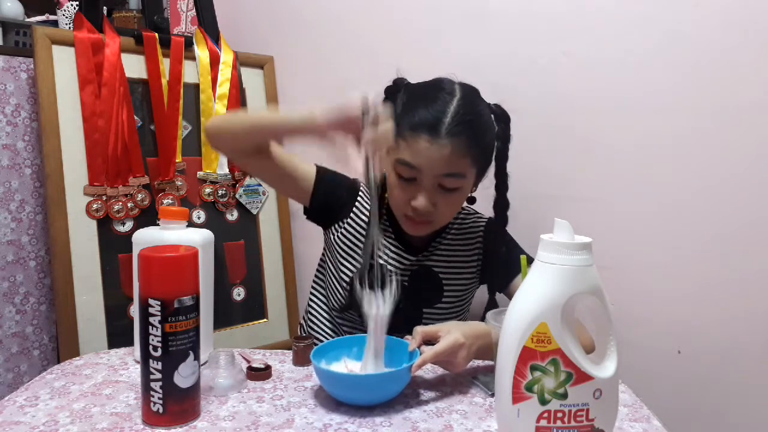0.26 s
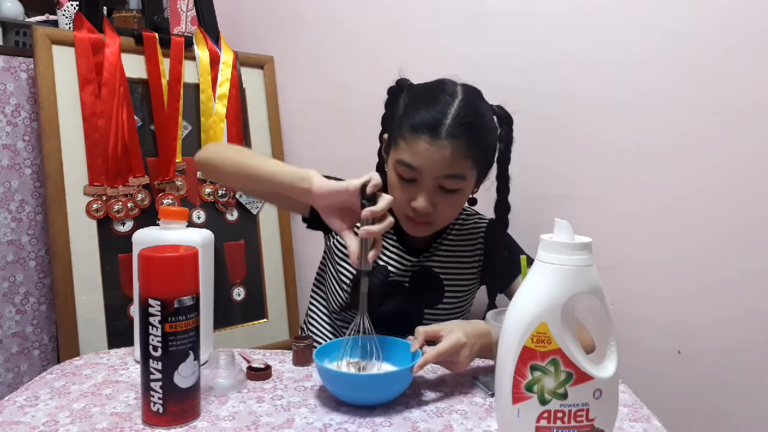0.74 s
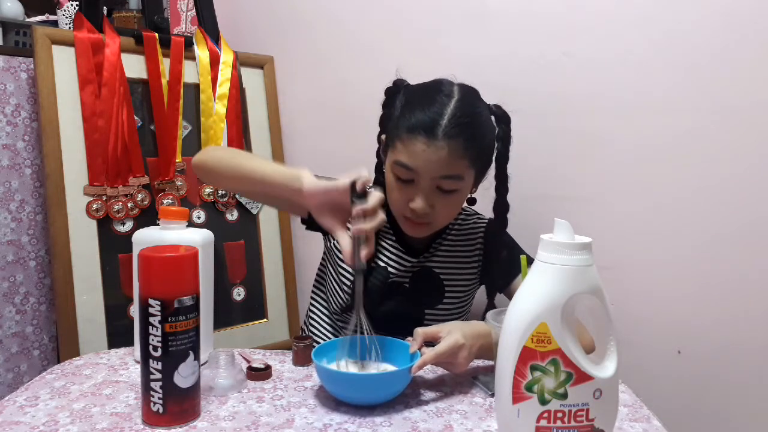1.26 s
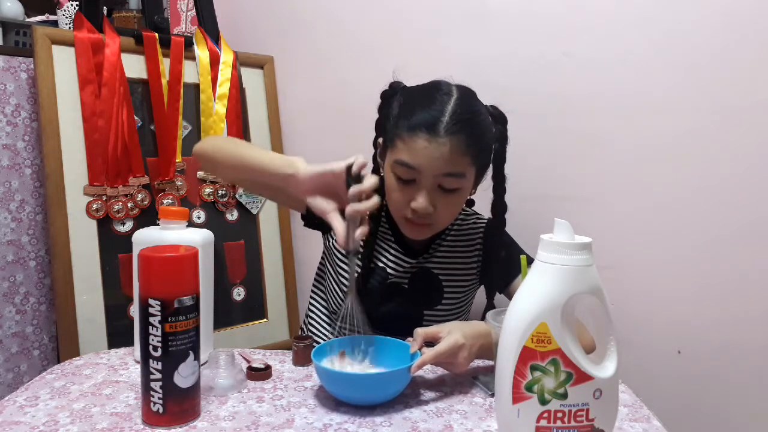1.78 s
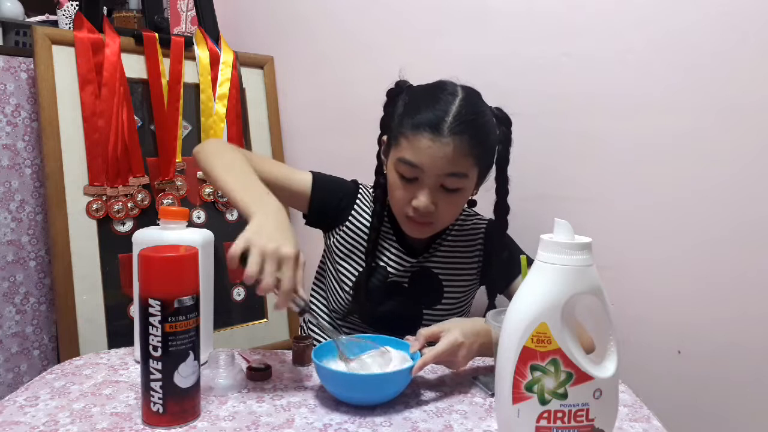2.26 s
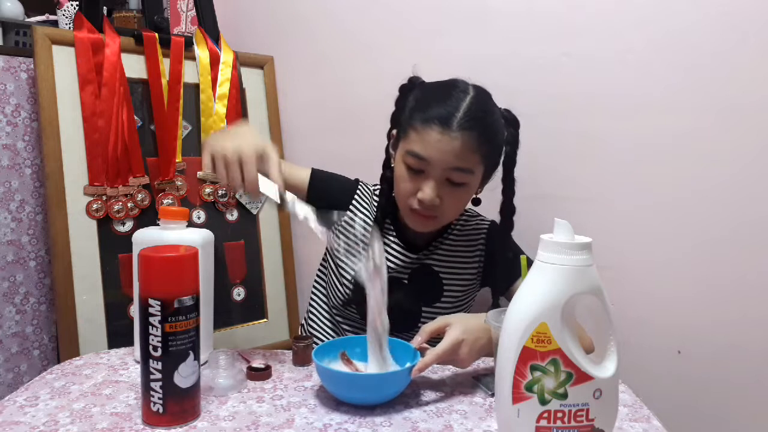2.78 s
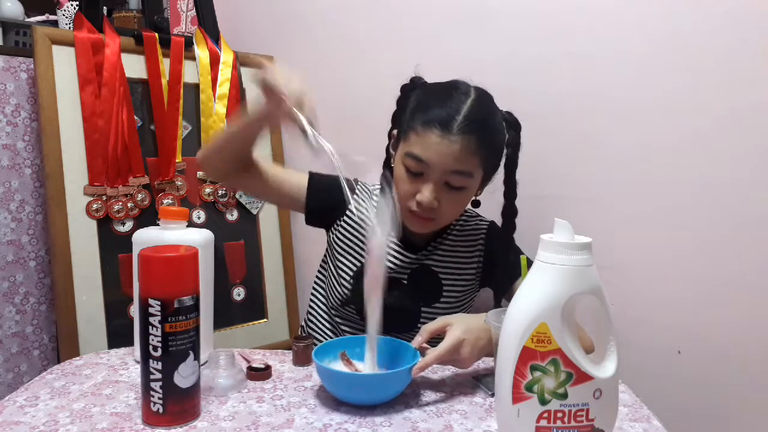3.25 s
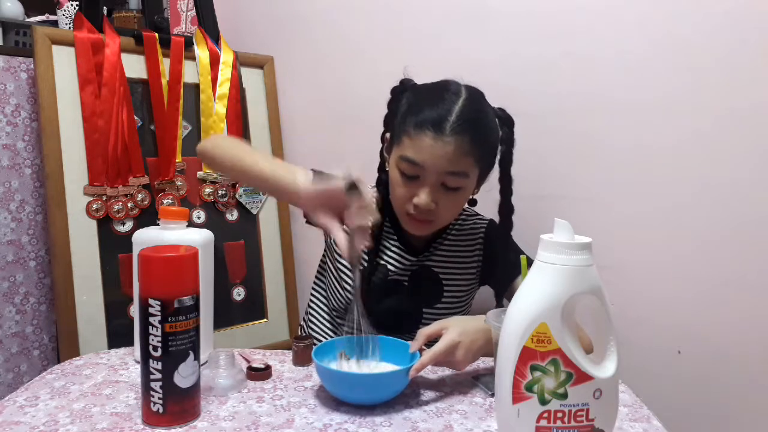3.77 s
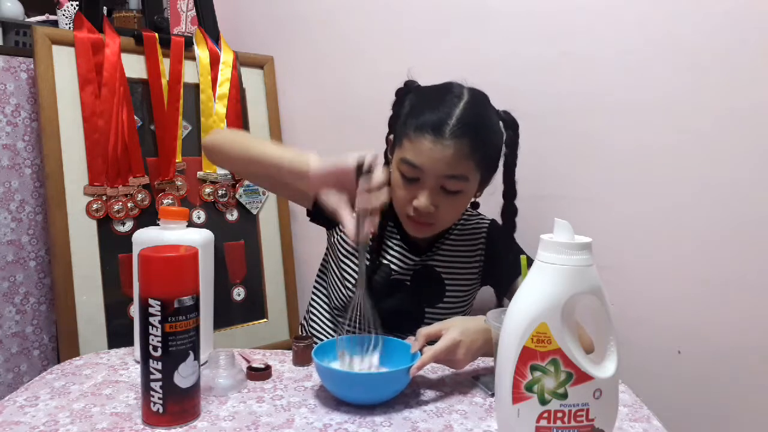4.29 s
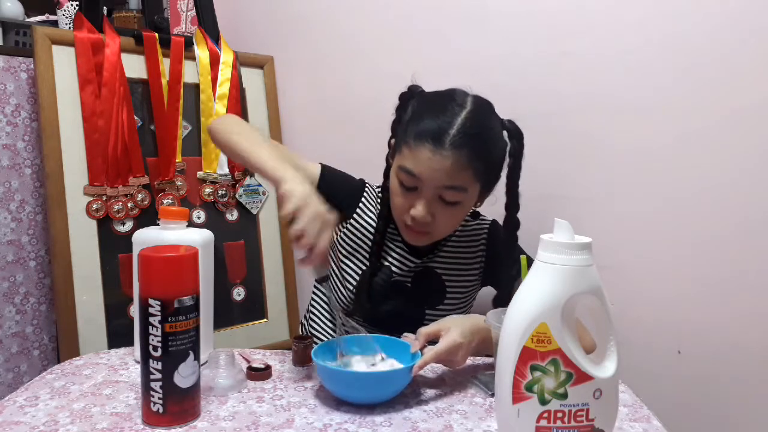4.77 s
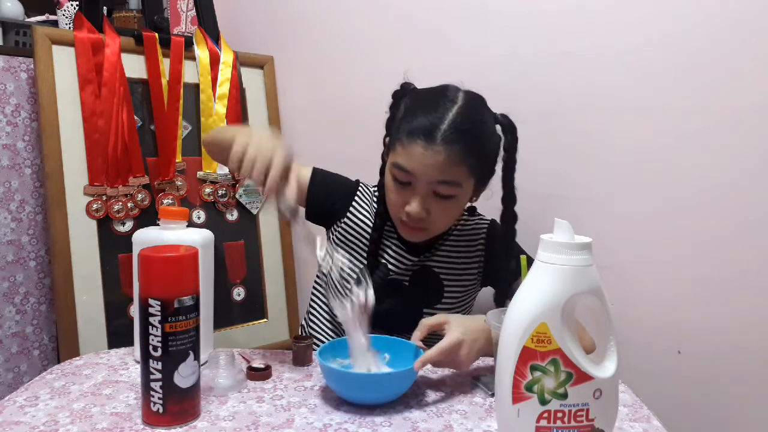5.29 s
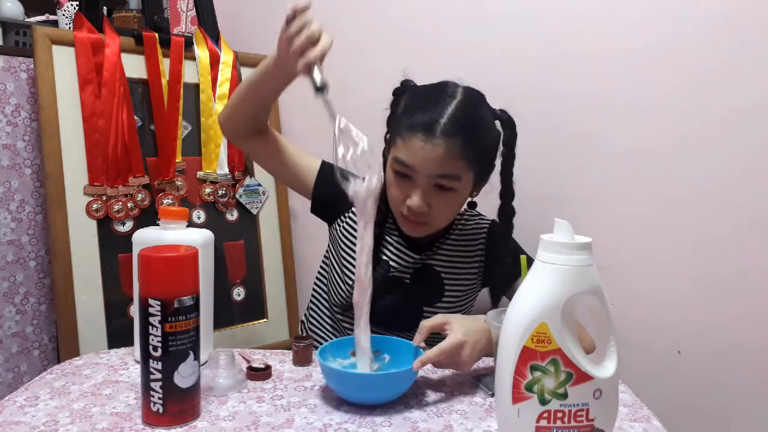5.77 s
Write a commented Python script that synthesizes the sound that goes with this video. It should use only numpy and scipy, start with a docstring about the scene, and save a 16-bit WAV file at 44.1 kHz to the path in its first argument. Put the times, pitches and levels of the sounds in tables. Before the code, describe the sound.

A wire whisk works thick slime in a plastic bowl, which knocks unevenly on a table amid faint wire clicks and sticky pops.

```python
"""Whisk in a bowl of slime

A wire whisk is dipped into thick slime and lifted again, in a plastic bowl on a table in a small,
bare room. The sticky mass drags the bowl up and lets it knock back on the table; the wires click and
air pockets pop softly. Under it lie quiet room noise and the faint drone of a distant engine."""
import sys
import numpy as np
from scipy import signal
from scipy.fft import rfft, irfft, next_fast_len
from scipy.io import wavfile
from scipy.ndimage import map_coordinates

SR = 44100
rng = np.random.default_rng(int(sys.argv[2]) if len(sys.argv) > 2 else 0)


def transcribe(u):
    """Save the signal u as a 16-bit wav file named by the first command-line argument.

    u: samples, shape (n,) or (channels, n), limited to [-1, 1]; the rate is SR.
    q: integer samples, one column per channel.
    """
    v = np.clip(np.atleast_2d(u).T, -1, 1)
    q = np.round(v * 32767).astype(np.int16)
    wavfile.write(sys.argv[1], SR, q)


N = 266364


def amp(db):
    """Decibels to gain."""
    return 10 ** (np.asarray(db) / 20)


def unit(x):
    """Scale to rms 1."""
    return x / np.sqrt(np.mean(x ** 2) + 1e-20)


def unit_attack(x):
    """Scale a hit to rms 1 over its first 25 ms."""
    return x / np.sqrt(np.mean(x[..., :SR // 40] ** 2) + 1e-20)


def along(points, hz):
    """Read a curve of (f/Hz, value) points on a log frequency axis."""
    f, values = np.transpose(points)
    return np.interp(np.log(hz + 1), np.log(f + 1), values)


def automation(rows):
    """One value per sample for each column after the time."""
    times, *columns = np.transpose(rows)
    return [np.interp(np.arange(N) / SR, times, column) for column in columns]


def wobble(x):
    """A smooth random curve with one knot per unit of x."""
    return map_coordinates(rng.standard_normal(int(x.max()) + 4), [x])


def filtered(x, response):
    """EQ x with a gain given as a function of frequency."""
    n = x.shape[-1]
    padded = next_fast_len(n + 8192)
    return irfft(rfft(x, padded) * response(np.fft.rfftfreq(padded, 1 / SR)), padded)[..., :n]


def add(track, s, sound):
    """Mix a sound into the track at time s."""
    start = max(round(s * SR), 0)
    part = track[:, start:start + sound.shape[-1]]
    part += sound[..., :part.shape[1]]


# Stereo width of the contacts, close to mono: f/Hz, side against mid/dB
CONTACT_WIDTH = [(150, -88), (500, -99), (1000, -74), (2000, -50), (4000, -44), (8000, -42), (14000, -28)]
def noise(colour, size, width=CONTACT_WIDTH):
    """Coloured stereo noise of rms 1, narrow in the bass and wider in the treble."""
    def mid_side_gains(hz):
        mid_db = along(colour, hz)
        return amp([mid_db, mid_db + along(width, hz)])
    mid, side = filtered(rng.standard_normal((2, size)), mid_side_gains)
    return unit(np.array([mid + side, mid - side]))


# Spectrum of the room tone: f/Hz, relative level/dB
AIR_COLOUR = [(15, -39), (25, -8.5), (91, -3.5), (156, 2), (198, -21), (233, -3), (313, -10), (399, -12.5),
              (433, -16.5), (703, -20), (970, -19), (1110, -16), (2300, -20), (3170, -20.5), (15500, -36.5)]
# Stereo width of the room tone: f/Hz, side against mid/dB
AIR_WIDTH = [(60, -22), (110, -23), (200, -19.5), (380, -10), (700, -1), (1290, -6.5), (2380, -5),
             (4400, -5), (8120, -5), (15000, 0.5)]
def room_tone():
    """A quiet, steady bed of bass-heavy noise."""
    return amp(-62.06) * noise(AIR_COLOUR, N, AIR_WIDTH)


# Swells of the handling rustle: t/s, level/dB
RUSTLE_LEVEL = [(0.0, -58), (1.66, -60.5), (1.95, -56.5), (3.08, -62.5), (4.58, -58), (6.04, -64.5)]
def stirring():
    """Hand and whisk rub the bowl, which passes a dull rustle to the table."""
    level_db, = automation(RUSTLE_LEVEL)
    # f/Hz, relative level/dB
    colour = [(40, -32), (90, -27), (160, 1.5), (260, -2), (450, -10.5), (1200, -19.5), (5000, -36)]
    return amp(level_db) * noise(colour, N)


# The engine's firing note: t/s, f/Hz, level before the fade/dB
ENGINE_NOTE = [(0.0, 56.5, -67), (0.58, 57.3, -73), (1.77, 62.7, -55), (2.08, 63.7, -74.5),
               (2.35, 63.6, -61), (2.45, 57.3, -74), (2.9, 57.1, -72)]
ENGINE_FADE_S = (2.8, 3.4)
def engine():
    """Only the firing note of a distant engine passes through the walls, then it fades out."""
    hz, db = automation(ENGINE_NOTE)
    fade = np.interp(np.arange(N) / SR, ENGINE_FADE_S, [1, 0])
    return amp(db) * fade * unit(np.sin(2 * np.pi * np.cumsum(hz) / SR))


# Reverb tail of the small room: f/Hz, t60/s
ROOM_DECAY = [(150, 0.23), (500, 0.22), (1500, 0.2), (3500, 0.2), (12000, 0.21)]
def burst(colour, t, crack, crack_t60, rise, ripple_db, ripple_hz):
    """A contact noise: a short direct crack, then the room's wash dying band by band."""
    hz, frame_s, spectrum = signal.stft(noise(colour, len(t)), SR, nperseg=256)
    # a random ripple across the spectrum gives each contact its own colour
    tint_db = ripple_db * wobble(hz / ripple_hz)[:, None]
    decay_db = 60 * frame_s / along(ROOM_DECAY, hz)[:, None]
    wash = signal.istft(spectrum * amp(tint_db - decay_db), SR, nperseg=256)[1][:, :len(t)]
    transient = 1 + crack * amp(-60 * t / crack_t60)
    return unit_attack(wash * transient * (1 - np.exp(-t / rise)))


def ring(modes, t, scatter_db, rise):
    """Damped modes, at new strengths and phases for each hit."""
    hz, db, t60 = np.transpose(modes)[:, :, None]
    db = db + scatter_db * rng.standard_normal(hz.shape)
    phase = 2 * np.pi * (hz * t + rng.random(hz.shape))
    partials = amp(db - 60 * t / t60) * np.sin(phase)
    return unit_attack(np.sum(partials, axis=0) * (1 - np.exp(-t / rise)))


def favour(modes, hz, boost_db, octaves):
    """The place of a contact drives the modes near one frequency hardest."""
    return [(f, db + boost_db * np.exp(-(np.log2(f / hz) / octaves) ** 2), t60) for f, db, t60 in modes]


def softened(modes, blow_db, edge_hz, hard_db, slope):
    """A gentle blow stays in contact longer and barely wakes the upper modes."""
    loss_db = slope * min(blow_db - hard_db, 0)
    return [(f, db + loss_db * (f > edge_hz), t60) for f, db, t60 in modes]


# Low modes of table and room: f/Hz, relative level/dB, t60/s
TABLE_MODES = [(149.7, -1.5, 0.16), (191.3, -6, 0.18), (209.6, 1.5, 0.19), (280.4, -2, 0.11)]
THUD_HZ, THUD_T60_S, THUD_RISE_S, STIFFEN_HZ_PER_DB = 198.4, 0.046, 0.00098, 4.5
def table_thud(t, slam_db):
    """The table top gives way and swings back; a slam stiffens the contact and raises the pitch."""
    hz = THUD_HZ + STIFFEN_HZ_PER_DB * slam_db
    swing = np.sin(2 * np.pi * hz * t) * amp(-60 * t / THUD_T60_S)
    thud = unit_attack(swing * (1 - np.exp(-t / THUD_RISE_S)))
    # the boom blooms behind the first swings
    boom = ring(favour(TABLE_MODES, hz, boost_db=1, octaves=0.19), t, scatter_db=4.5, rise=0.021)
    return thud + 0.34 * boom


# Modes of the bowl on the table: f/Hz, relative level/dB, t60 without the hand's grip/s
BOWL_MODES = [(325, -4, .2), (368, -7, .16), (412, 0, .185), (472, -4, .135), (497, -4, .125),
              (549, -9, .16), (620, -8, .12), (663, -3, .18), (700, -8, .165), (724, -6, .13),
              (788, -12, .145), (882, -12, .14), (921, -10, .14), (1165, -13, .135), (1212, -12, .13),
              (1370, -16, .145)]
# Spectrum of the contact's tock: f/Hz, relative level/dB
TOCK_COLOUR = [(70, -67), (130, -21), (260, 7), (450, -2.5), (660, 5), (780, -23), (1000, -9), (1200, -2),
               (1600, -38), (4000, -72)]
BASE_HZ, GRIP_DB_PER_S = 375, 45
def bowl_ring(t, blow_db, slam_db, ring_hz):
    """A short, broad tock sets the plastic bowl ringing, damped by the hand that holds it."""
    modes = favour(BOWL_MODES, BASE_HZ, boost_db=1.5, octaves=0.38)  # the base takes every knock
    boost_db = max(11.5 - 0.66 * slam_db, 0)  # a slam wakes the modes more evenly
    modes = favour(modes, ring_hz, boost_db, octaves=0.16)
    modes = softened(modes, blow_db, edge_hz=755, hard_db=-41, slope=0.36)
    ringing = ring(modes, t, scatter_db=2, rise=0.015) * amp(-GRIP_DB_PER_S * t)
    tock = burst(TOCK_COLOUR, t, crack=4, crack_t60=0.025, rise=0.0006, ripple_db=2, ripple_hz=200)
    return 0.64 * ringing + 0.42 * tock


# Stiff modes of the rim: f/Hz, relative level/dB, t60/s
RIM_MODES = [(1308, 9, 0.26), (1750, -7.5, 0.27), (1760, -5, 0.29), (2030, -4.5, .2), (2000, 10, 0.13),
             (2010, -25, 0.14), (2250, 1, 0.082), (2240, 9.5, 0.14), (2660, -5, 0.11), (2800, 4, 0.17),
             (3165, -9, 0.13), (3560, -17, 0.23)]
# Spectrum of the clack: f/Hz, relative level/dB
CLACK_COLOUR = [(400, -33.5), (900, -1.5), (1200, -1), (1550, 3.5), (2200, 0.5), (3000, -4.5), (4500, -18),
                (8000, -28)]
def rim_clack(t):
    """The stiff rim answers a knock with a bright clack and a short ring."""
    ringing = ring(RIM_MODES, t, scatter_db=2.5, rise=0.0006)
    clack = burst(CLACK_COLOUR, t, crack=1.5, crack_t60=0.01, rise=0.00043,
                  ripple_db=2.5, ripple_hz=212.5)
    return clack + 0.4 * ringing


# Spectrum of the rattling wires: f/Hz, relative level/dB
WIRE_COLOUR = [(1500, -31), (3500, 7.5), (4600, 6.5), (6000, 1), (8500, -3.5), (11000, -8), (15500, -19)]
def wire_rattle(t):
    """The jolted wires of the whisk add a splash of treble."""
    return burst(WIRE_COLOUR, t, crack=0.98, crack_t60=0.019, rise=0.0023, ripple_db=0, ripple_hz=266)


# Cues of the bowl landing: t/s, relative force/dB, hardness/dB, freedom to ring/dB, favoured f/Hz
KNOCK_CUES = [(0.206, -44, -7, -2.5, 546), (0.730, -45.5, -6, -1, 328), (0.740, -44, -4, -6, 330),
              (0.756, -45.5, 2, 5, 323), (0.775, -41, -10, -3, 650), (0.793, -44.5, -20, -3, 320),
              (0.974, -42, -5, 4, 684), (0.981, -31, -2.5, 0.5, 500), (1.237, -33.5, 0.5, -1, 422),
              (1.570, -43, -11, -2, 403), (1.586, -33.5, -15, -4, 356), (1.618, -44.5, -3.5, -2, 1140),
              (1.789, -35.5, -16, -6, 323), (2.521, -54.5, -1, -2, 615), (2.611, -43.5, -6, 2, 507),
              (2.701, -50, -7, -6.5, 665), (3.63, -55, 2, -10, 402), (3.903, -38, -15, -5, 464),
              (4.087, -42, -5, -3.5, 326), (4.136, -23.5, -4.5, 4.5, 870), (4.142, -27.5, -2.5, 4.5, 470),
              (4.384, -38, -12, -8, 374), (4.490, -48, 2, 1, 606), (4.494, -34.5, 6, -11, 325),
              (4.515, -32.5, -18, -7.5, 325), (5.055, -52, -10, -11, 330), (5.242, -17.5, -5.5, 3, 440),
              (5.255, -21, -3.5, 3.5, 816)]
SLAM_DB, LOW_CUT_HZ = -33.5, 133  # any force above SLAM_DB is a slam
def knocks():
    """Each knock thuds the table and rings the bowl; harder contacts bring more clack and rattle."""
    track, t = np.zeros((2, N)), np.arange(SR // 3) / SR
    for s, force_db, hardness_db, freedom_db, ring_hz in KNOCK_CUES + nudges():
        slam_db = max(force_db - SLAM_DB, 0)
        blow_db = force_db + freedom_db
        table = amp(force_db - 1.54) * table_thud(t, slam_db)
        bowl = amp(blow_db - 2) * bowl_ring(t, blow_db, slam_db, ring_hz)
        rim = amp(force_db + hardness_db - 14) * rim_clack(t)
        wires = amp(force_db + 2 * hardness_db - 26) * wire_rattle(t)
        add(track, s, table + bowl + rim + wires)
    # a small table radiates almost nothing below its lowest mode
    return signal.sosfilt(signal.butter(4, LOW_CUT_HZ, "high", fs=SR, output="sos"), track)


def nudges(count=5, start_s=0.25, end_s=2.25, force_db=-58, spread_db=2, hardness_db=-10, freedom_db=-7):
    """Cues for faint knocks as the whisk works the slime, each at a chance moment in its own slot."""
    cues = []
    for slot, (when, softness, place) in enumerate(rng.random((count, 3))):
        s = start_s + (end_s - start_s) * (slot + when) / count
        ring_hz = BOWL_MODES[int(place * len(BOWL_MODES))][0]
        cues.append((s, force_db + spread_db * (1 - 2 * softness), hardness_db, freedom_db, ring_hz))
    return cues


# Cues of wire ticks and sticky pops: t/s, relative snap level/dB, relative body level/dB, rise/s
TICK_CUES = [(0.381, -57, -61, .003), (2.100, -55.5, -60, .0038), (2.365, -59.5, -55.5, 0.0028),
             (3.41, -46, -58, .002), (4.849, -54.5, -53, .008), (5.042, -58.5, -47, .0002)]
# Spectrum of the bright snap: f/Hz, relative level/dB
SNAP_COLOUR = [(2000, -30), (5200, -12), (6600, 0), (9000, -4), (12000, -11), (15500, -22)]
# Spectrum of the rounder body: f/Hz, relative level/dB
BODY_COLOUR = [(600, -22), (1500, 1.5), (3000, -2.5), (4500, -5), (8000, -19)]
def ticks_and_pops():
    """Small ticks and pops: a bright snap over a rounder body, with sharp or soft onsets."""
    track, t = np.zeros((2, N)), np.arange(SR // 3) / SR
    for s, snap_db, body_db, rise in TICK_CUES:
        snap = burst(SNAP_COLOUR, t, crack=0.88, crack_t60=0.014, rise=rise, ripple_db=1.5, ripple_hz=298)
        body = burst(BODY_COLOUR, t, crack=1.3, crack_t60=0.01, rise=rise, ripple_db=1.5, ripple_hz=231)
        add(track, s - 0.001, amp(snap_db - 13.5) * snap + amp(body_db - 7.5) * body)
    return track


def scene():
    """Bowl and whisk up front, over a bed of engine drone and room tone."""
    return knocks() + ticks_and_pops() + stirring() + engine() + room_tone()


TOP_HZ = 15800
def record(dry):
    """A brick-wall high cut on the whole mix."""
    return filtered(dry, lambda hz: hz < TOP_HZ)


dry = scene()
out = record(dry)
transcribe(out)
```